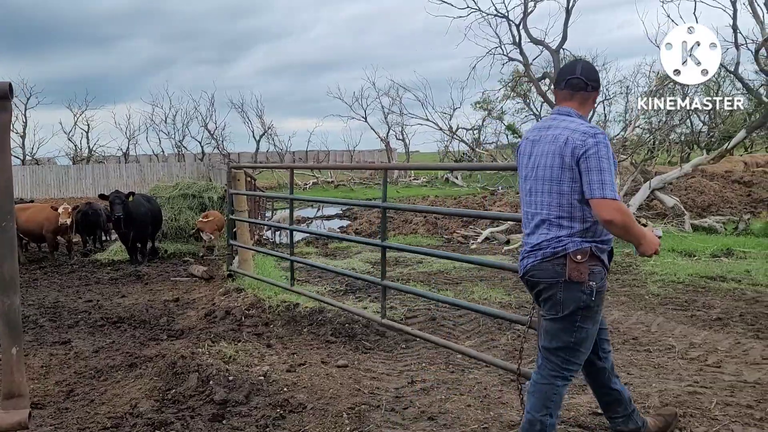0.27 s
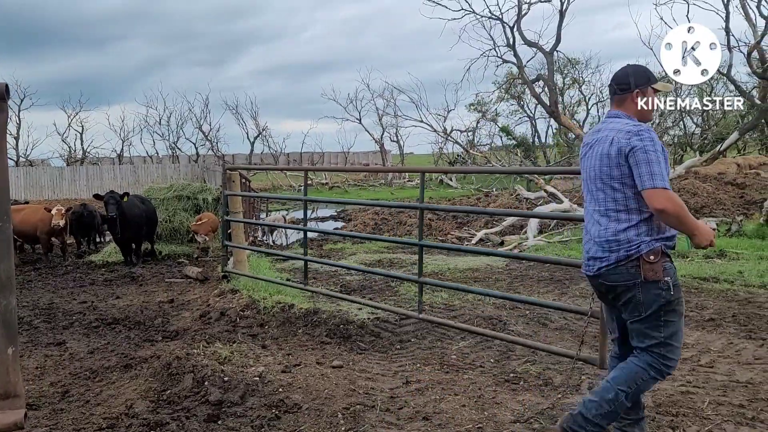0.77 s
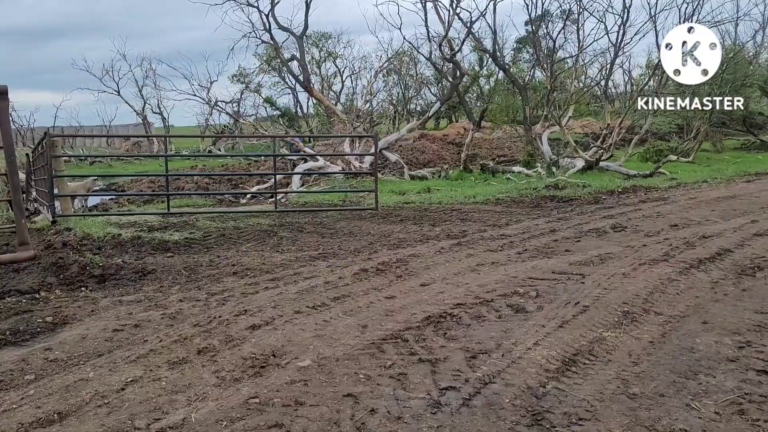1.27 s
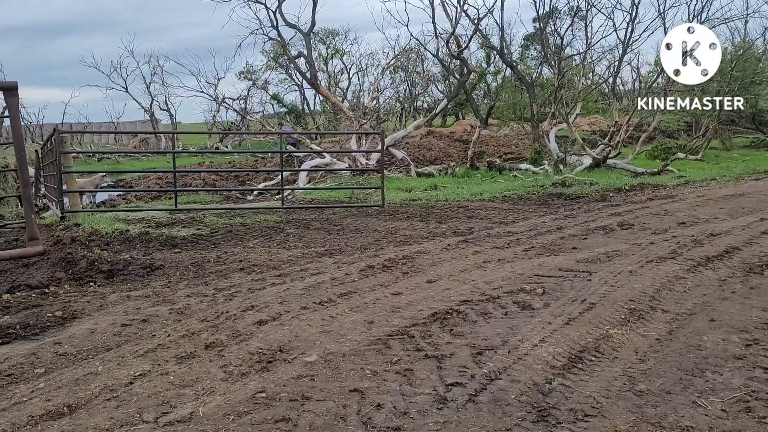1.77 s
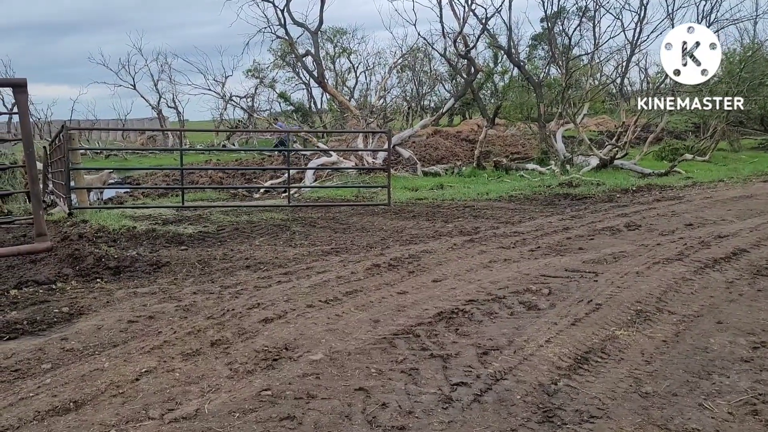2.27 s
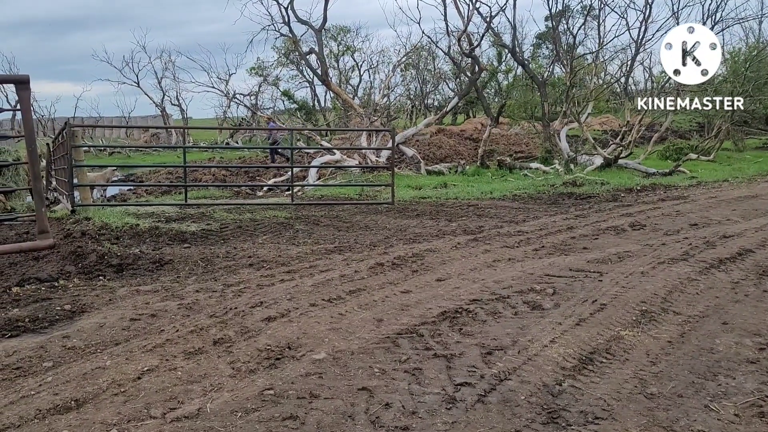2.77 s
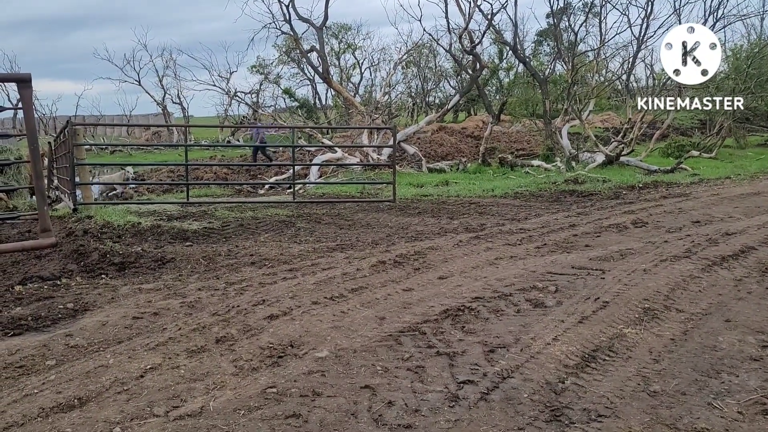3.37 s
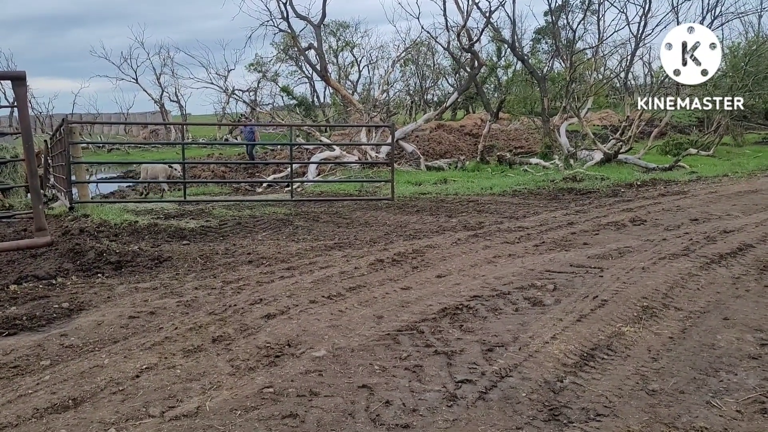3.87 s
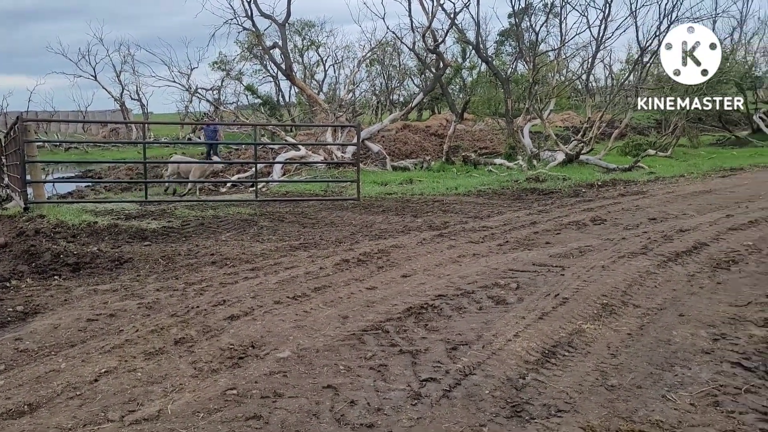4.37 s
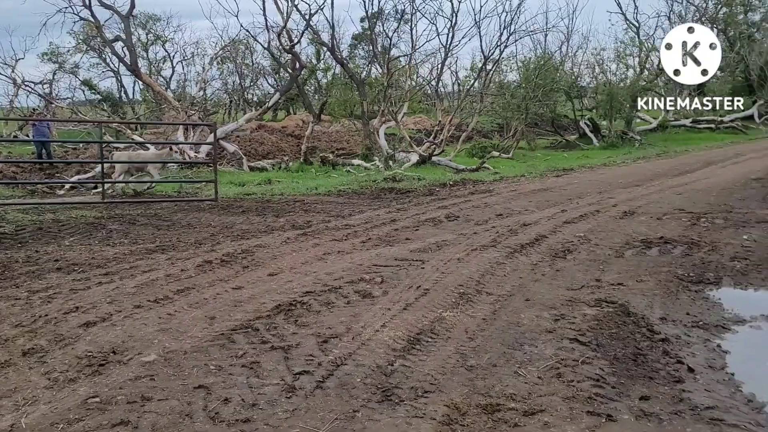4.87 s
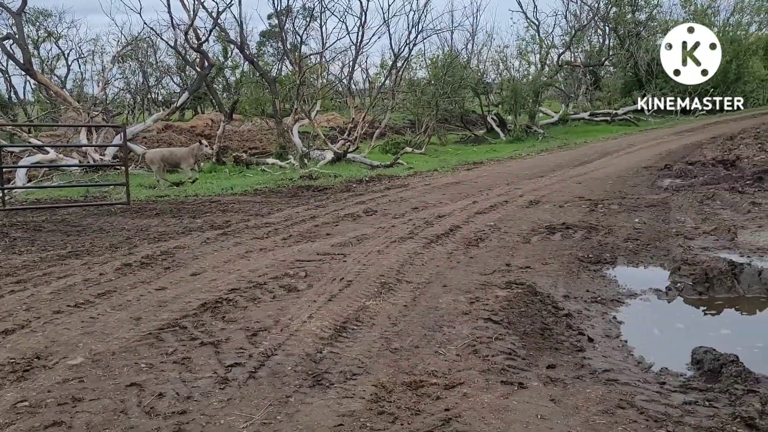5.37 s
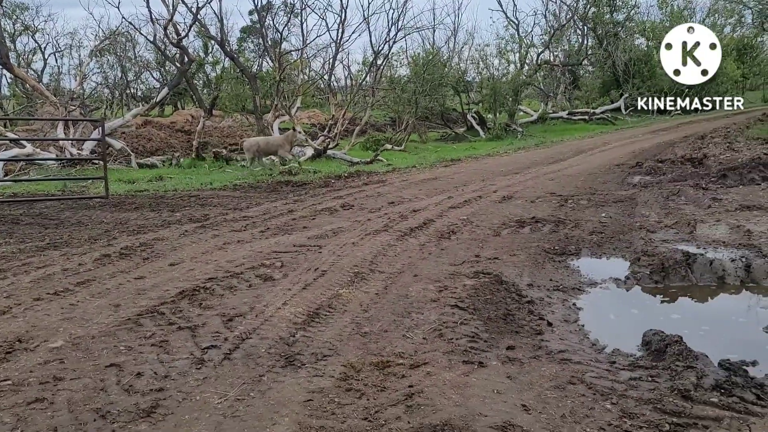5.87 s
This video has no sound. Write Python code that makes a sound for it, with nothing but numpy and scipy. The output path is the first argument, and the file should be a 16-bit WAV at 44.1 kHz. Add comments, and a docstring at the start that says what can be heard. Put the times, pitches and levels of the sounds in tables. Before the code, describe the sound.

Close to the microphone, a steel pen gate rings and buzzes, tiny chain links tink, and the latch clanks. The chain then drags over a metal tube with hard, hollow knocks until it cuts off abruptly. An idling diesel's low hum and clatter continue with windy rumble, soft thumps and open-air wash. Later, slight rustling and faint quick bird chirps appear.

```python
"""A steel pen gate is heard first: its latch clanks, small chain links tink and the chain drags over a tube.
The metal is struck modes that decay exponentially, with shaped noise for rattle, rasp and hiss.
A diesel engine idles nearby: harmonic sines, faint whines and a noise clatter that throbs at the firing rate.
Wind rumbles, thumps and rustles at two microphone ports over a wash of noise; a bird chirps as gliding sines.
The gate sounds stop abruptly at 1.372 s, while the engine and the air go on."""
import sys
import numpy as np
from scipy import signal
from scipy.fft import rfft, irfft, next_fast_len
from scipy.io import wavfile
from scipy.ndimage import uniform_filter1d

SR = 44100
rng = np.random.default_rng(int(sys.argv[2]) if len(sys.argv) > 2 else 0)


def store_pcm(level_fs):
    """Save levels as 16-bit WAV."""
    pcm = np.round(np.clip(level_fs, -1, 1) * 32767).astype(np.int16)
    wavfile.write(sys.argv[1], SR, np.atleast_2d(pcm).T)


N = 269010


def gain_of(db):
    """Decibel law: a level in dB becomes an amplitude ratio."""
    return 10 ** (np.asarray(db) / 20)


def evened(x):
    """Normalisation: scales a signal to unit rms."""
    return x / np.sqrt(np.mean(x ** 2) + 1e-20)


def read(points, hz):
    """Spectral interpolation: reads a table on a log-frequency axis."""
    f, value = np.transpose(points)
    return np.interp(np.log(hz + 1), np.log(f + 1), value)


def curves(rows):
    """Linear interpolation: the columns of a timed table at every sample."""
    s, *columns = np.transpose(rows)
    return [np.interp(np.arange(N) / SR, s, c) for c in columns]


def add(mix, s, sound):
    """Superposition: adds a sound to the mix at time s."""
    part = mix[max(round(s * SR), 0):][:len(sound)]
    part += sound[:len(part)]


def wavering(length, size, second_size=1):
    """Random modulation: noise smoothed by one or two moving averages, at unit rms."""
    smooth = uniform_filter1d(rng.standard_normal(length), size)
    return evened(uniform_filter1d(smooth, second_size))


def coloured(x, colour):
    """Minimum-phase filtering: the log gain alone fixes the phase of a causal filter."""
    level_db = np.maximum(read(colour, abs(np.fft.fftfreq(4096, 1 / SR))), -100)
    log_response = np.conj(signal.hilbert(np.log(gain_of(level_db))))
    taps = np.fft.ifft(np.exp(log_response)).real[:2048]
    return signal.oaconvolve(x, taps)[:N]


def ports(x, pair, smear_s):
    """Partial coherence: two ports with mean x share a phase-shifted part and a scattered part of opposite sign."""
    phase_lead, unlike_db, difference_db = pair
    size = next_fast_len(N + SR)
    padded = np.pad(x, (SR // 2, size - N - SR // 2), "reflect")
    hz, t = np.fft.rfftfreq(size, 1 / SR), np.arange(SR) / SR
    phase = np.interp(hz, *np.transpose(phase_lead))
    ratio = gain_of(read(difference_db, hz)) * np.exp(1j * phase)
    lean = (ratio - 1) / (ratio + 1)
    lean /= np.maximum(abs(lean) / 2.0, 1)  # at most twice the mean
    tail = rng.standard_normal(SR) * np.exp(-t / smear_s)
    scatter = np.exp(1j * np.angle(rfft(tail, size)))
    side = lean + gain_of(read(unlike_db, hz)) * scatter
    both = irfft(rfft(padded) * np.array([1 + side, 1 - side]), size)
    return both[:, SR // 2:][:, :N]


def hiss(colour, patchy_db, size=1024):
    """Short-time synthesis: random spectra under a set envelope, with drifting patches."""
    frames, hz = 4 * N // size + 5, np.fft.rfftfreq(size, 1 / SR)
    real, imaginary, patches = rng.standard_normal((frames, len(hz), 3)).T
    patches = uniform_filter1d(patches, size=12, axis=0)
    patches = evened(uniform_filter1d(patches, size=12, axis=1))
    envelope = gain_of(read(colour, hz)[:, None] + patchy_db * patches)
    spectra = (real + 1j * imaginary) * envelope
    return evened(signal.istft(spectra, nperseg=size, noverlap=size * 3 // 4)[1][:N])


def ring(modes, size=9000, spread=1, rise_s=0.00065):
    """Modal decay: after one blow each mode dies exponentially; the contact time sets the rise."""
    t = np.arange(size) / SR
    tones = np.zeros(size)
    for hz, db, t60 in modes:
        decay = gain_of(db - 60 * t / np.clip(t60, .02, 3.0))
        tones += decay * np.sin(2 * np.pi * (hz * t + spread * rng.random()))  # random starting phase
    return tones * np.clip(t / rise_s, 0, 1)


# Pitch of the exhaust hum, twice the firing rate: (time [s], frequency [Hz])
HUM_PITCH = [(0, 69.66), (.7, 70.6), (4.9, 70.82), (5.1, 69.58), (6.1, 69.4)]
# Exhaust hum as it wavers in the wind, before the quick waver: (time [s], level [dB])
HUM_LEVEL = [(0.0, -40), (0.05, -26.5), (0.1, -36), (0.42, -32), (0.47, -53), (0.55, -43), (0.66, -31.5),
             (0.8, -53), (0.85, -65), (0.93, -36), (1.07, -41), (1.17, -28.5), (1.21, -38), (1.26, -27.5),
             (1.83, -29), (1.97, -42), (2.07, -29.5), (2.26, -30), (2.29, -43), (2.43, -33.5), (2.51, -55),
             (2.55, -40), (2.92, -46), (2.95, -35), (3.31, -40), (3.36, -40), (3.41, -31), (3.74, -36),
             (3.77, -30.5), (4.03, -54), (4.06, -55), (4.09, -40.5), (4.37, -37.5), (4.4, -27.5),
             (4.47, -49), (4.52, -36), (4.79, -31), (4.82, -41), (4.88, -29.5), (5.06, -51), (5.1, -34),
             (5.39, -28), (5.64, -37.5), (5.66, -31.5), (6.1, -32.5)]
# Orders of the exhaust hum: (multiple of the hum [ratio], level [dB])
ORDERS = [(.5, -12), (1, -0.5), (2, -27.5), (3.5, -27.5)]
# Faint engine whines, before the waver: (frequency [Hz], level [dB])
WHINES = [(432, -56.5), (608.3, -63), (1480, -67), (2126, -70.5), (2805, -72)]
# Steady noise of engine and field: (time [s], clatter level [dB], wash level [dB])
BED = [(0, -43.5, -40.5), (.17, -50, -43), (.3, -52, -51), (.6, -51.5, -51.5), (1.36, -46.5, -42),
       (1.4, -49, -45), (2.5, -47.5, -49), (3.5, -48, -47), (4.3, -48.5, -47.5), (4.8, -52.5, -46.5),
       (5.4, -55.5, -43), (6.1, -54.5, -44)]
# Clatter spectrum: (frequency [Hz], density [dB per Hz])
CLATTER = [(88, -16.5), (150, -9.5), (339, -17), (411, -1.5), (462, -49), (561, -11.5), (985, -27),
           (1150, -18), (1760, -21.5), (2810, -13), (3620, -18.5), (4390, -33), (6110, -27.5), (11800, -51),
           (15500, -53)]
# Phase of the clatter between the ports: (frequency [Hz], left lead [rad])
CLATTER_LEAD = [(0, 0), (500, 2.2), (1500, 3), (2600, 4.8), (3400, 7.7), (5200, 10), (7000, 15.3),
                (15800, 31)]
# Clatter at the ports: the lead, (frequency [Hz], unlike part [dB]), (frequency [Hz], left minus right [dB])
CLATTER_PORTS = (CLATTER_LEAD, [(200, -2), (600, -4), (1500, -2), (3000, 0), (7000, 0), (12000, 0)],
                  [(200, 1), (1200, 6), (2700, -9), (4800, -1), (6600, -7), (8500, 6), (15000, 0)])
WAVER_DB, WAVER_S = 0.8, 0.058  # rms and smoothing time of the hum's quick waver
THROB, THROB_RISE, THROB_FALL = 0.8, 0.04, 0.11  # depth; rise and fall as shares of a firing cycle


def engine():
    """Periodic combustion: exhaust orders and whines as sines, and noise modulated once per firing."""
    hz, t = curves(HUM_PITCH)[0], np.arange(N) / SR
    turns = np.cumsum(hz) / SR
    size = round(WAVER_S * SR)
    waver = wavering(N, size, size)
    # moving air shifts the phase between the ports
    drift = np.cumsum(uniform_filter1d(rng.standard_normal(N), size=2000)) * 0.0034
    mid = sum(gain_of(db) * np.sin(2 * np.pi * k * turns) for k, db in ORDERS)
    side = sum(gain_of(db) * np.sin(2 * np.pi * (k * turns + drift)) for k, db in ORDERS)
    hum = mid + gain_of(-23.0) * side * [[1], [-1]]
    hum = hum * np.sqrt(2) * gain_of(curves(HUM_LEVEL)[0] + WAVER_DB * waver)
    whine = sum(gain_of(db) * np.sqrt(2) * np.sin(2 * np.pi * (f * t + 5.97 * drift)) for f, db in WHINES)
    whine *= gain_of(4.2 * np.roll(waver, SR))  # the waver, one second later
    pulses = np.exp(-(turns / 2 % 1) / THROB_FALL)
    throb = 1 + THROB * uniform_filter1d(pulses, round(THROB_RISE * 2 * SR / hz[0]) + 1)
    clatter = gain_of(curves(BED)[0]) * evened(throb * hiss(CLATTER, patchy_db=1.5))
    return hum + ports(clatter + whine, CLATTER_PORTS, 0.02)


# Wind rumble, before the flutter: (time [s], level [dB])
GUSTS = [(0, -32.5), (.2, -34.5), (.46, -39.5), (.78, -33.5), (1.14, -31), (1.4, -39), (1.5, -35.5),
         (1.9, -39), (2.6, -35.5), (3.0, -39.5), (3.6, -39.5), (3.8, -33), (4.18, -36.5), (4.3, -42),
         (4.55, -32), (5.05, -41), (5.25, -34.5), (6.0, -40.5), (6.1, -30)]
# Rumble spectrum: (frequency [Hz], density [dB per Hz])
RUMBLE = [(12, -33), (20, -9), (48, -2), (75, 4), (141, -11.5), (286, -16), (414, -15), (506, -42),
          (600, -18.5), (780, -70), (1320, -120)]
# Wind at the ports: (frequency [Hz], left lead [rad]), (frequency [Hz], unlike part [dB]),
# (frequency [Hz], left minus right [dB])
WIND_PORTS = ([(0, .1), (300, .6)], [(25, -3), (70, 1), (150, 0), (400, -2)], [(20, -1), (300, 1.5)])
FLUTTER_DB, FLUTTER_S = 0.9, 0.045  # rms and smoothing time; the wind comes in lumps


def wind():
    """Turbulent pressure: low noise in random lumps, partly unlike at the two ports."""
    size = round(FLUTTER_S * SR)
    lumps = wavering(N, size, size)
    rumble = hiss(RUMBLE, patchy_db=3.5, size=2048)
    return ports(gain_of(curves(GUSTS)[0] + FLUTTER_DB * lumps) * rumble, WIND_PORTS, 0.26)


# Field wash spectrum: (frequency [Hz], density [dB per Hz])
WASH = [(88, -61), (150, 10.5), (263, 1.5), (436, 1.5), (618, -3.5), (751, -5), (1450, -7), (2060, -12.5),
        (2410, -27), (4840, -21), (6230, -41.5), (11800, -36), (15500, -67)]
# Phase of the wash between the ports: (frequency [Hz], left lead [rad])
WASH_LEAD = [(0, 0), (350, .7), (860, 2.1), (2200, 3), (3000, 3.7), (15800, 20)]
# Wash at the ports: the lead, (frequency [Hz], unlike part [dB]), (frequency [Hz], left minus right [dB])
WASH_PORTS = (WASH_LEAD, [(200, -58), (1500, 9.5), (3500, -17), (10000, -41)], [(200, 1.5), (900, 4),
               (2400, -1.5), (5000, -1), (6500, -4), (8500, 3), (15000, -8)])


def field_wash():
    """Diffuse sound: the open field as smooth noise with a slowly changing level."""
    return ports(gain_of(curves(BED)[1]) * hiss(WASH, patchy_db=2.0), WASH_PORTS, 0.093)


# Clanks: (time [s], ring level [dB], rattle level [dB], rattle decay t60 [s])
CLANKS = [(.6185, -36.5, -37, 0.12), (.6365, -39, -40, 0.18), (.6445, -42, -41, 0.13),
          (.6625, -44, -43, 0.24), (.96, -60, -54, .15), (1.207, -40, -46, 0.2), (1.255, -59, -54, 0.14)]
# Latch modes, before the uneven blows: (frequency [Hz], level [dB], decay t60 [s])
LATCH = [(1810, -6, 0.11), (2364, 4.5, 0.06), (2440, -7, .05), (4050, -13, 0.09), (6250, -0.5, 0.1),
         (6380, -7, .07), (6600, -16, 0.1), (6740, -8, .12), (8700, -20, 0.12), (11500, -29, 0.12),
         (12560, -28, .12)]
# Rattle spectrum: (frequency [Hz], density [dB per Hz])
RATTLE = [(500, -7), (1500, -6), (2100, -13), (2500, 3.5), (3000, -2), (3700, -10), (4200, -7), (4900, -12),
          (6900, -5), (8400, -14.5), (13000, -18.5), (14500, -51)]
# The earlier blow: (ring level [dB], rattle level [dB], rattle decay t60 [s])
CLANG = (-43.5, -33, 0.3)
# Bar modes: (frequency [Hz], level [dB], decay t60 [s])
BARS = [(2400, -5, 1.3), (2460, -6.5, 2), (2554, -6, 2.2), (2630, -9, 2), (2765, -9.5, 1.7),
        (2820, -9, 1.6), (2920, -8, 1.6), (3100, -12, 1.8), (3270, -12.5, 1.6), (3260, -1.5, 0.27),
        (4120, -11, 0.25), (4170, -7, 0.41), (6720, -12, 0.89), (6800, -19, 0.73), (6998, -3, 0.24),
        (7240, -7, 0.3)]
UNEVEN_DB, CLANK_RISE_S = 2.5, 0.002  # each clank strikes the modes unevenly
BUZZ_DB, BUZZ_S = 6, 0.0036  # the loose bars buzz as they ring out
SHAKE_DB, SHAKE_S = 1.5, 0.004  # the rattle is broken into uneven grains


def latch():
    """Impact excitation: bars ring on from an earlier blow; clanks ring the latch and rattle loose parts."""
    out, t = np.zeros(N), np.arange(15000) / SR
    shake = wavering(N, round(SHAKE_S * SR))
    rattle = evened(coloured(gain_of(SHAKE_DB * shake) * rng.standard_normal(N), RATTLE))
    bar_db, loose_db, loose_t60 = CLANG
    fade = np.hanning(60000)[30000:]
    for mode in BARS:
        buzz = wavering(30000, round(BUZZ_S * SR), 60)
        add(out, 0, fade * gain_of(bar_db + BUZZ_DB * buzz) * ring([mode], size=30000))
    add(out, 0, gain_of(loose_db - 60 * t / loose_t60) * rattle[-len(t):])
    for k, (s, ring_db, rattle_db, t60) in enumerate(CLANKS):
        uneven = UNEVEN_DB * rng.uniform(-1, 1, len(LATCH))
        struck = [(hz, db + u, decay) for (hz, db, decay), u in zip(LATCH, uneven)]
        add(out, s, gain_of(ring_db) * ring(struck, rise_s=CLANK_RISE_S))
        envelope = gain_of(rattle_db - 60 * t / t60) * np.clip(t / 0.0018, 0, 1)
        add(out, s, envelope * rattle[k * len(t):][:len(t)])
    return out


# Link tinks: (time [s], ring level [dB], tick level [dB])
TINKS = [(0.0014, -52, -60), (0.0214, -61, -76), (0.1161, -58, -70), (0.238, -46, -47), (0.2567, -46, -48),
         (0.2663, -45, -62), (0.297, -48, -66), (0.3133, -50, -56), (0.3434, -62, -60), (0.4519, -63, -74),
         (0.5384, -60, -69), (0.6115, -65, -60), (0.762, -49, -50), (0.9542, -59, -66), (1.0971, -57, -64),
         (1.1398, -42.5, -41), (1.2181, -65, -72), (1.3257, -64, -68)]
# Link modes, before detuning: (frequency [Hz], level [dB])
LINK = [(14950, -14), (15040, -16), (15120, -6), (15200, 7), (15270, 4), (15350, -9), (15450, -18)]
TINK_T60_S, TICK_T60_S, TINK_RISE_S = 0.15, 0.047, 0.0012


def tinks():
    """Beating: close, very high modes of tiny links interfere, with a short noise tick at each onset."""
    out, t = np.zeros(N), np.arange(900) / SR
    tick_band = signal.butter(2, [6500, 13500], "band", fs=SR, output="sos")
    for s, ring_db, tick_db in TINKS:
        detune = rng.uniform(0.96, 1.003, len(LINK))
        modes = [(hz * d, db, TINK_T60_S) for (hz, db), d in zip(LINK, detune)]
        add(out, s, gain_of(ring_db) * ring(modes, rise_s=TINK_RISE_S))
        tick = signal.sosfilt(tick_band, rng.standard_normal(len(t)))
        add(out, s, gain_of(tick_db - 60 * t / TICK_T60_S) * np.clip(t / TINK_RISE_S, 0, 1) * tick)
    return out


# Chain drag, before fixed trims: (time [s], level [dB], share of the high modes [dB], treble hiss level [dB])
DRAG = [(0.675, -37, -8, -52), (0.689, -37.5, -4, -57), (0.733, -29, -6, -51), (0.767, -25, -4, -49),
        (0.859, -23.5, -7.5, -49), (0.889, -29.5, -2.5, -52.5), (0.953, -22, -12, -52),
        (0.965, -22, 0, -43), (0.971, -26, -7, -49), (1.019, -21.5, -10, -50), (1.201, -22, -2, -43.5),
        (1.213, -20.5, -3.5, -39.5), (1.327, -19.5, -8, -46.5), (1.343, -27.5, -11, -57),
        (1.37, -28.5, -9, -62)]
# Links that catch hard: (time [s], peak before weighting [dB], pitch of the modes struck hardest [Hz])
JOLTS = [(0.684, -19.5, 590), (0.699, -27, 1630), (0.717, -25, 947), (0.727, -15, 1610), (0.735, -22, 1260),
         (0.753, -13, 1250), (0.788, -20, 754), (0.823, -12, 1660), (0.841, -20, 821), (0.892, -30, 845),
         (0.903, -29, 875), (0.914, -19, 830), (0.941, -14, 830), (0.984, -18, 874), (0.993, -19, 891),
         (1.011, -20, 762), (1.041, -15, 1230), (1.096, -5.5, 890), (1.112, -5, 796), (1.138, -2.5, 780),
         (1.165, -15, 996), (1.182, 2, 778), (1.195, -5, 830), (1.264, -5, 1100), (1.3, -4.5, 1080)]
# Tube modes, relative within the low and high groups: (frequency [Hz], level [dB])
TUBE = [(377, 0), (440, -3), (562, 3.5), (643, 3), (758, 4), (816, 3), (868, 6), (956, 1), (981, -3),
        (1011, 2), (1085, 5.5), (1160, 3), (1247, 8.5), (1331, -8), (1484, -0.5), (1540, -15), (1614, 4.5),
        (1776, 6), (1869, 5.5), (1925, -9), (1976, 2), (2450, -3.5), (2910, -1.5), (3150, -5), (4110, -7.5),
        (4250, -7.5), (6200, -22), (6800, -10)]
# Rasp of the slipping links: (frequency [Hz], density [dB per Hz])
RASP = [(150, -35.5), (250, -7.5), (375, -1.5), (443, -8), (760, 3), (1060, -3.5), (1180, -6.5),
        (1280, 1.5), (1820, -2), (2160, -13), (2430, -7), (3150, -18.5), (4610, -34), (6900, -35),
        (8310, -53), (14000, -51)]
# Treble hiss of the drag: (frequency [Hz], density [dB per Hz])
SCRAPE = [(2500, -32), (3600, 4), (4200, -4), (5000, 0), (6200, 0.5), (7000, -4), (8000, -14), (13000, -21)]
GATE_END_S = 1.372
LINKS_PER_S, SLOWING_PER_S2 = 125, 95  # the chain starts quick and slows steadily
TUBE_T60_S, DAMPED_HZ = 0.13, 4000  # low-mode decay; modes above this pitch die faster
LINK_CREST_DB = 7.5  # peak of an ordinary link over the drag level
AIM_DB_PER_OCTAVE = 24  # a jolt's strength falls away from its pitch
JOLT_KNOCK, JOLT_RING = 0.75, 1.62  # most that a jolt adds to the knock; its weight on the ring
KNOCK_DB = -13.5  # dry knock of each link, before the drag level


def drag():
    """Stick-slip excitation: links bump, slip and catch on the tube; they knock, rasp and strike its modes."""
    t = np.arange(N) / SR
    start_s = DRAG[0][0]
    since = np.clip(t - start_s, 0, GATE_END_S - start_s)
    level_db, bright_db, hiss_db = curves(DRAG)
    per_s = LINKS_PER_S - SLOWING_PER_S2 * since
    irregular = 1 + 2.5 * uniform_filter1d(rng.standard_normal(N), size=400)
    links = np.cumsum(per_s * irregular) / SR
    bump = np.diff(np.floor(links), prepend=0) > 0
    slip_db = 3 * np.minimum(rng.exponential(1, N), 3.5) - 19
    slips = (rng.random(N) < 1500 / SR) * gain_of(slip_db)  # about 1500 a second
    blows = bump * gain_of(1.7 * rng.uniform(-3.5, 0, N)) + slips
    s, peak_db, aim_hz = np.transpose(JOLTS)
    at = np.round(s * SR).astype(int)
    jolt = gain_of(peak_db - level_db[at] - LINK_CREST_DB)
    blows[at] = np.minimum(jolt, JOLT_KNOCK)

    low, high = np.zeros((2, N))
    for hz, db in TUBE:
        force = blows * (1 + 1.45 * rng.uniform(-1.36, 1, N))  # uneven from mode to mode
        aim = gain_of(-AIM_DB_PER_OCTAVE * abs(np.log2(hz / aim_hz)))
        force[at] = JOLT_RING * jolt * rng.choice([-1, 1], len(at)) * aim
        t60 = TUBE_T60_S / (1 + (hz / DAMPED_HZ) ** 2)
        struck = signal.oaconvolve(force, ring([(hz, db, t60)], spread=0, rise_s=0.0009))[:N]
        add(high if hz > 1300 else low, 0, struck)
    share = np.clip(gain_of(bright_db), 0, .95)
    tube = share * evened(high) + np.sqrt(1 - share ** 2) * evened(low)

    # each blow throws a noise burst that decays over some 90 samples in power
    power = signal.lfilter([1], [1, -np.exp(-1 / 90)], blows ** 2)
    spray = power ** .5 * rng.standard_normal(N)
    rasp = evened(coloured(spray, RASP))
    knock = evened(coloured(blows, RASP))
    contact = gain_of(-8.0) * tube + gain_of(-9.5) * rasp + gain_of(KNOCK_DB) * knock
    scrape = evened(coloured(spray + 1.7 * rng.standard_normal(N), SCRAPE))
    return (t > start_s) * (gain_of(hiss_db - 2.5) * scrape + gain_of(level_db + 1.5) * contact)


# Soft thumps on the housing: (time [s], starting level before the rise [dB], decay t60 [s], upper band edge [Hz])
THUMPS = [(1.842, -29, 0.17, 236), (2.128, -32, 0.15, 171), (2.684, -33, 0.042, 880),
          (3.763, -33, 0.082, 240), (3.803, -27, 0.2, 190), (3.96, -38, 0.75, 297), (4.16, -31, 0.21, 265),
          (4.779, -39.5, 0.31, 246)]
THUMP_SIDE_DB = 2  # the part that differs between the ports


def thumps():
    """Pressure pulses: wind on the housing as decaying bursts of low noise, partly opposite at the ports."""
    t = np.arange(12000) / SR
    mid, side = np.zeros((2, N))
    for s, db, t60, hz in THUMPS:
        band = signal.butter(3, [70, max(hz, 120)], "band", fs=SR, output="sos")
        envelope = gain_of(db - 60 * t / t60) * np.clip(t / 0.0053, 0, 1)
        puffs = evened(signal.sosfilt(band, rng.standard_normal((2, len(t)))))
        add(mid, s, envelope * puffs[0])
        add(side, s, envelope * puffs[1])
    return mid + gain_of(THUMP_SIDE_DB) * side * [[1], [-1]]


# Soft rustles in the gust: (time [s], length [s], level [dB])
RUSTLES = [(3.68, 0.15, -48.5), (3.791, .18, -44), (3.981, 0.18, -49)]
# Rustle spectrum: (frequency [Hz], density [dB per Hz])
RUSTLE = [(150, -31), (550, 3), (900, 3), (1500, -5), (1900, -30), (3200, -90)]
GRAIN_DB, GRAIN_S = 1.5, .005  # rms and smoothing time of the roughness


def rustles():
    """Amplitude modulation: rough noise swells and fades, alike at both ports."""
    out = np.zeros(N)
    grain = wavering(N, round(GRAIN_S * SR))
    rough = evened(gain_of(GRAIN_DB * grain) * hiss(RUSTLE, patchy_db=3.0, size=256))
    for s, length_s, db in RUSTLES:
        size = round(length_s * SR)
        add(out, s, gain_of(db) * np.hanning(size) * rough[round(s * SR):][:size])
    return out


# Bird notes: (time [s], length [s], start frequency [Hz], end frequency [Hz], level midway between ports [dB])
CHIRPS = [(3.598, .022, 6600, 4800, -57), (3.688, .014, 4700, 5500, -58), (3.71, .01, 4970, 6170, -57),
          (3.813, .012, 5410, 5400, -57), (3.912, 0.01604, 5330, 5560, -56), (3.954, .009, 6580, 5200, -54),
          (4.002, .03, 5850, 4700, -60), (4.119, 0.0082, 5380, 5080, -56), (4.133, .01, 5640, 5600, -54),
          (4.156, 0.02, 5604, 5950, -56), (4.17, .02, 6040, 6800, -61), (4.226, 0.044, 7350, 4180, -52),
          (4.272, 0.033, 5400, 5110, -59)]


def bird():
    """Frequency modulation: short sines glide linearly in pitch, stronger at the right."""
    out = np.zeros(N)
    for s, length_s, start_hz, end_hz, db in CHIRPS:
        hz = np.linspace(start_hz, end_hz, round(length_s * SR))
        tone = np.sin(2 * np.pi * np.cumsum(hz) / SR)
        add(out, s, gain_of(db) * np.sqrt(np.hanning(len(hz))) * tone)
    return out * gain_of([[-2.5], [2.5]])


# Phase of the gate between the ports: (frequency [Hz], left lead [rad])
GATE_LEAD = [(0, 0), (430, 1.2), (700, -.2), (1300, -.4), (1600, -1.6), (2200, -1), (13000, 0),
             (15800, -.3)]
# Gate at the ports: the lead, (frequency [Hz], unlike part [dB]), (frequency [Hz], left minus right [dB])
GATE_PORTS = (GATE_LEAD, [(250, -4), (750, -10), (1300, -5.5), (3000, -2.5), (10000, 0.5), (15000, -6)],
               [(200, -3), (600, 3.5), (1000, -1), (1800, -3), (2400, 2), (6500, -3), (8000, -2),
               (15000, -3)])


def scene():
    """Superposition: all sources sum, and the gate sounds stop abruptly."""
    before_end = np.clip((GATE_END_S - np.arange(N) / SR) / 0.00069, 0, 1)
    gate = ports(latch() + tinks() + drag(), GATE_PORTS, 0.011)
    return engine() + wind() + field_wash() + gate * before_end + thumps() + rustles() + bird()


# Spells in which the bass is near mono: (from [s], to [s])
NARROW = [(3.68, 3.73), (3.78, 3.95), (4.0, 4.1), (4.155, 4.19), (4.27, 4.31), (4.39, 4.65), (4.72, 4.76),
          (4.81, 4.95)]
NARROW_DB, NARROW_HZ, NARROW_FADE_S = -17, 830, 0.028
EDGE_HZ = 15800


def record(dry):
    """Linear filtering: near-mono bass in short spells, then a low cut at 28 Hz and a treble band limit."""
    t, side = np.arange(N) / SR, (dry[0] - dry[1]) / 2
    bass = signal.sosfiltfilt(signal.butter(2, NARROW_HZ, fs=SR, output="sos"), side)
    inside = np.any([(t > a) & (t < b) for a, b in NARROW], axis=0)
    spell = uniform_filter1d(inside * 1., round(NARROW_FADE_S * SR))
    narrowed = dry - (1 - gain_of(NARROW_DB * spell)) * bass * [[1], [-1]]
    thinned = signal.sosfilt(signal.butter(2, 28, "high", fs=SR, output="sos"), narrowed)
    padded = np.pad(thinned, [(0, 0), (255, 255)], "reflect", reflect_type="odd")
    taps = signal.firwin(511, EDGE_HZ, window=("kaiser", 9), fs=SR)
    return signal.oaconvolve(padded, taps[None], "valid", axes=1)


dry = scene()
out = record(dry)
store_pcm(out)
```